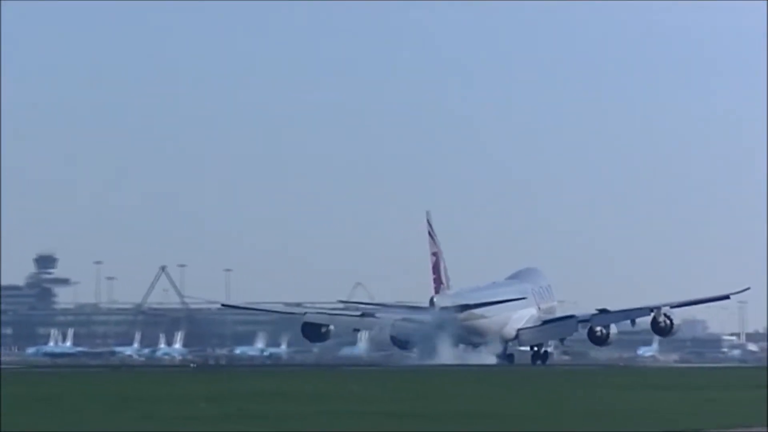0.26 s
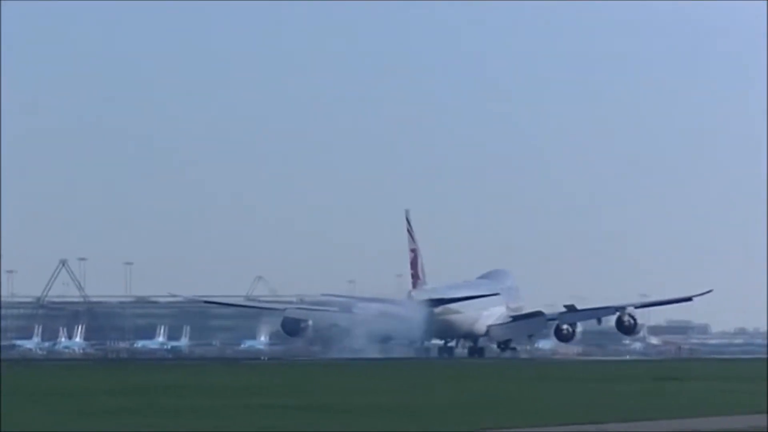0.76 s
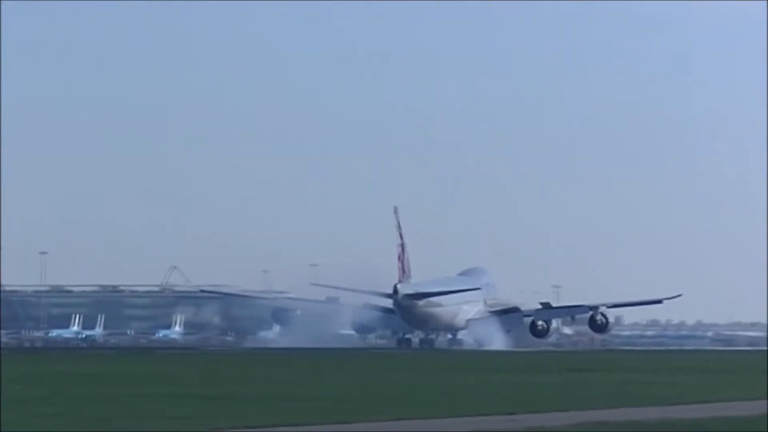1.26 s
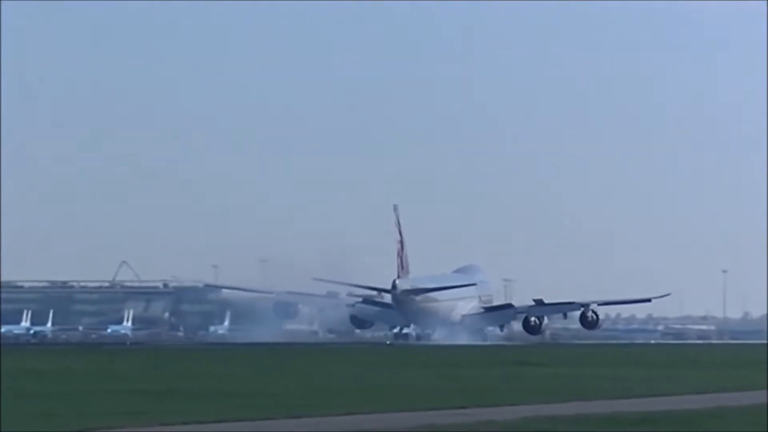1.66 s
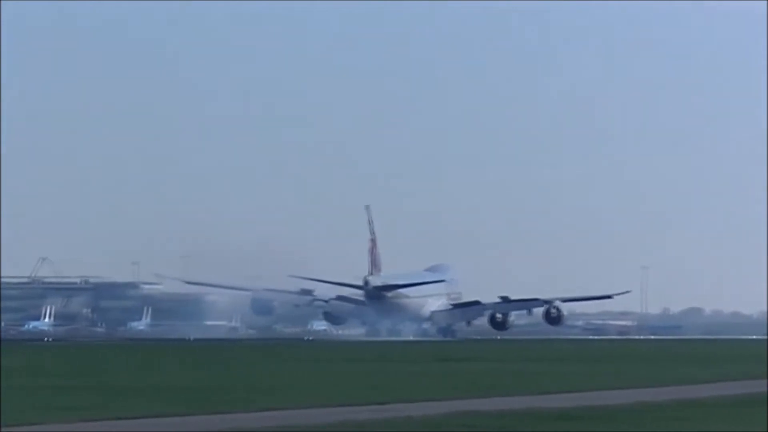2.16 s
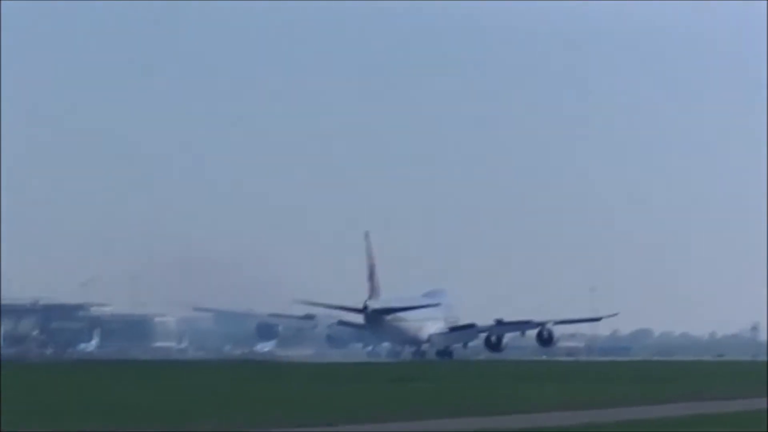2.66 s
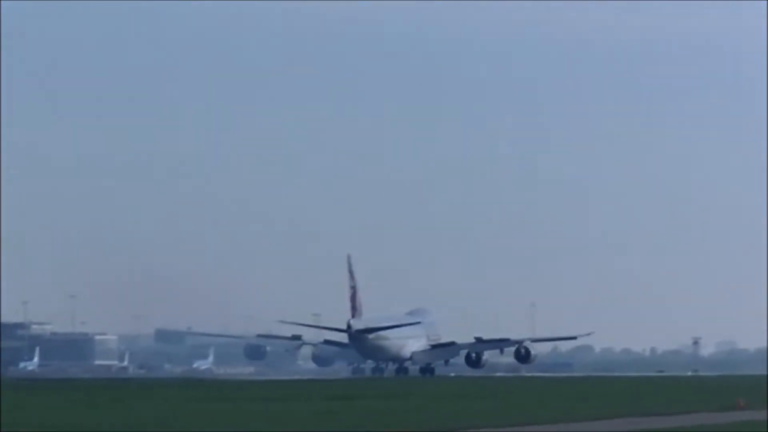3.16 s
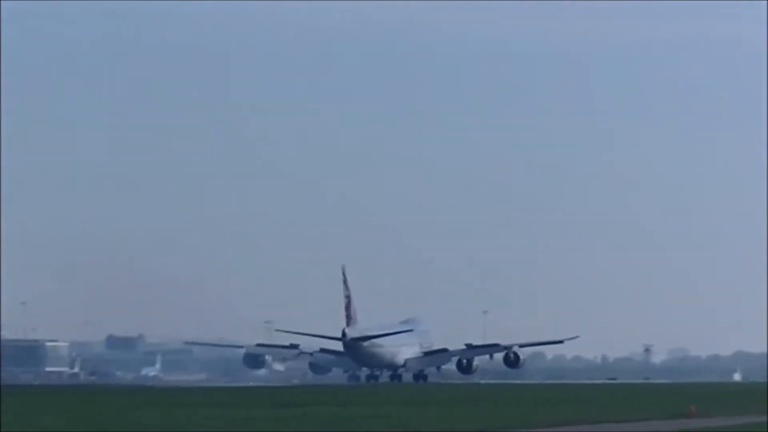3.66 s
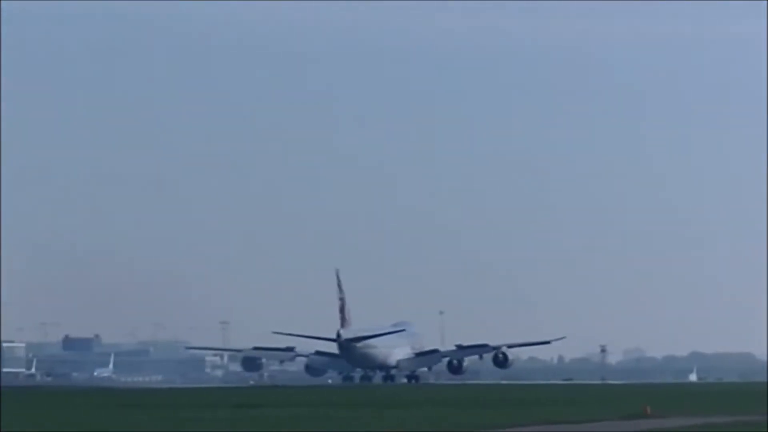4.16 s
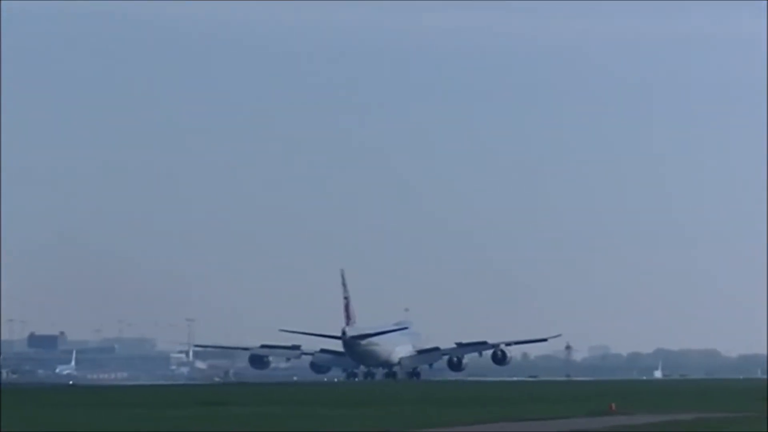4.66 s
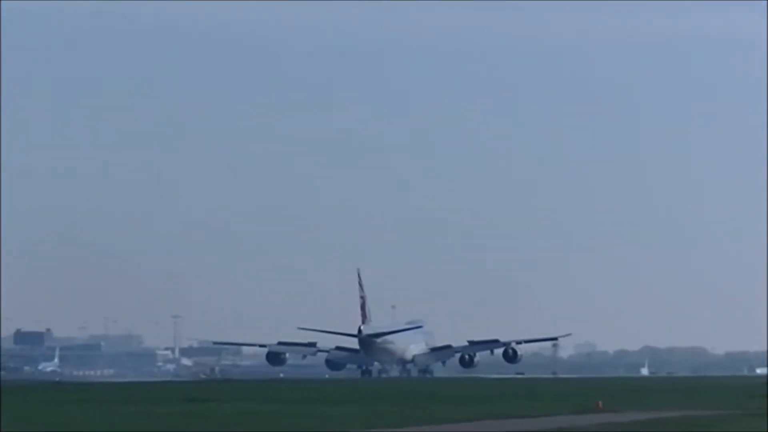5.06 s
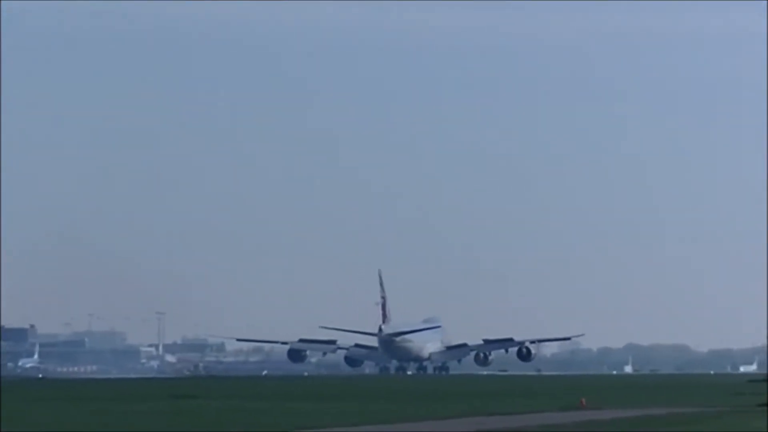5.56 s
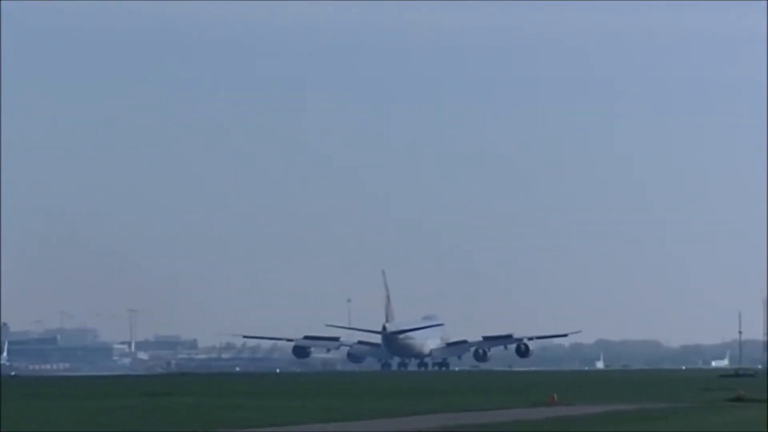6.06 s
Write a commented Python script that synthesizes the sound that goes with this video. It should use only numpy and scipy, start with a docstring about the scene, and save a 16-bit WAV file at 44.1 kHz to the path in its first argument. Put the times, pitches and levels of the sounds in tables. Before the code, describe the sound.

A distant four-engined jet rolls away after touchdown with a low billowing roar that swells midway, while small birds chirp and whistle in nearby grass.

```python
"""Airfield grass, far from the runway: a four-engined jet freighter rolls away just after touchdown.
Exhaust: patchy filtered noise that swells and billows in the wind as the tail turns this way, with swinging puffs.
Engine air: a finer noise rush, and a fan hiss that fades. Birds: gliding, swinging sines with scattered echoes.
The camera adds shaped noise hiss, a thin beating sine whine and noise ticks; light knocks ring in a few modes."""
import sys
import numpy as np
from scipy import signal
from scipy.fft import rfft, irfft
from scipy.io import wavfile
from scipy.ndimage import uniform_filter1d

SR = 44100
rng = np.random.default_rng(int(sys.argv[2]) if len(sys.argv) > 2 else 0)


def persist_wave(psi):
    """Save psi, clipped to +-1, as 16-bit WAV."""
    counts = np.round(np.clip(psi, -1, 1) * 32767).astype(np.int16)
    wavfile.write(sys.argv[1], SR, np.atleast_2d(counts).T)


N = 278712
TIME_S = np.arange(N) / SR
BINS_HZ = np.fft.rfftfreq(N, 1 / SR)
ALONG = np.linspace(0, 1, 64)  # progress through a note

# exhaust roar, swelling and surging: (time [s], level [dB])
ROAR_LEVEL = [(0.0, -37.5), (0.28, -34), (0.88, -38.5), (1.16, -29.5), (1.52, -35.5), (1.65, -29),
              (1.8, -35), (2.16, -29.5), (2.32, -34), (2.36, -30), (3.24, -26.5), (3.36, -28.5),
              (3.76, -25), (3.84, -28), (4.04, -24.5), (5.04, -32), (5.12, -27.5), (6.32, -30.5)]
# gain of the deep rumble within the roar: (time [s], gain [dB])
RUMBLE_GAIN = [(.75, -7), (1.1, -1.5), (3.7, -1.3), (4.3, 1), (5.1, 0.5)]
# brighter engine noise, before trims: (time [s], rush level [dB], fan hiss level [dB])
ENGINE_LEVELS = [(0, -41, -45.5), (0.8, -41, -48), (1.5, -44, -51), (2.4, -43.5, -53.5), (4.9, -44, -53.5),
                 (6.32, -40, -52)]
# relative spectra of roar, rush, fan hiss and camera hiss: (frequency [Hz], density [dB per Hz])
ROAR_SPECTRUM = [(20, -51), (48, -56), (80, -33), (140, -22), (280, -6.5), (335, -0.5), (385, -.5),
                 (440, -8.5), (560, -15.5), (750, -29), (1500, -40), (4000, -81.5)]
RUSH_SPECTRUM = [(200, -31), (480, 0), (800, 0), (900, -3.5), (1020, -4), (1300, -10.5), (1800, -13.5),
                 (3000, -34.5), (6000, -61)]
FAN_SPECTRUM = [(700, -27), (1400, -12), (1600, 2.5), (1750, 1), (1950, -4), (2600, -4.5), (2850, -12),
                (3500, -11), (4500, -11.5), (5100, -22), (6200, -34.5), (10000, -56)]
HISS_SPECTRUM = [(20, 9), (6000, 7), (7700, 3.5), (9000, 0.5), (12000, -2.5), (14200, -5), (15400, -12.5)]
# left-right likeness of engine noise: (frequency [Hz], coherence [0-1])
COHERENCE = [(40, .5), (65, 0.7), (110, 0.95), (330, 1), (700, 0.99), (1350, 0.85), (1700, 0.96),
             (4400, .94)]
# left microphone against right: (frequency [Hz], level lead [dB], phase lead [rad])
LEFT_LEAD = [(65, 5, -0.7), (200, -0.4, -0.44), (450, -1, 0.061), (620, -1.7, 0.32), (850, -4, 0.12),
             (1150, -1, 0.44), (1450, -1.3, 1.15), (1910, -1, 0.29), (2600, -3, 0.6), (3400, -5.5, 0.1),
             (4400, -0.5, 0.36)]
# exhaust puffs, before trim: (time [s], level [dB], half length [s])
PUFFS = [(0.269, -28, 0.013), (0.675, -26.5, 0.0079), (1.183, -23, 0.015), (2.798, -22.5, 0.0067),
         (3.211, -14.5, 0.0038), (3.473, -21.5, 0.01), (3.639, -18.5, 0.011), (4.78, -20, 0.0064),
         (5.151, -20.5, 0.016), (6.025, -22, 0.01)]
# camera body ticks, before trim: (time [s], level [dB], half length [s])
TICKS = [(1.524, -56, .003), (3.312, -56, .0022), (3.553, -55, 0.0028), (4.295, -58, .008),
         (4.87, -57, .002)]
# relative tick spectrum: (frequency [Hz], density [dB per Hz])
TICK_SPECTRUM = [(1000, -16), (4000, -8), (6000, 4), (8200, 0), (9500, -8), (15000, -21)]
# whine of the camera electronics: (mean frequency [Hz], level [dB])
WHINE = [(7800, -90), (7826, -87)]
# bouts of distant twitter: (time [s], length [s], level of the nearest chips [dB])
TWITTER = [(0.022, 0.87, -56), (1.301, .85, -61.5), (4.1, .85, -58), (5.05, 0.78, -59)]
# slurs of the nearest songbird, before trim: (time [s], length [s], opening [Hz], closing [Hz], level [dB])
SLURS = [(1.997, 0.057, 2480, 2800, -58), (2.11, 0.032, 3960, 4380, -61), (2.138, 0.046, 3660, 2640, -47),
         (2.19, 0.048, 2660, 3820, -45), (2.365, 0.053, 3230, 2710, -49.5),
         (2.512, 0.052, 4100, 4620, -53.5), (2.608, 0.054, 3930, 3510, -47.5),
         (2.826, .061, 3040, 3550, -50), (2.945, 0.035, 3900, 2950, -54.5), (3.272, 0.075, 2745, 3020, -52),
         (3.353, 0.04, 3120, 2910, -51), (3.452, 0.03, 3860, 2610, -49.5), (3.599, 0.09, 3456, 3196, -48.5),
         (3.675, 0.046, 3490, 2710, -50.5), (3.795, 0.042, 4020, 2900, -49),
         (3.834, 0.048, 2860, 2790, -49.5), (3.972, 0.033, 2810, 3230, -50),
         (3.992, 0.022, 3190, 2640, -45.5), (4.568, 0.022, 3330, 3150, -53.5),
         (4.803, 0.011, 3050, 3600, -51.5), (5.785, 0.048, 3770, 4100, -62)]
# quick downward chips, before trim: (time [s], middle pitch [Hz], level [dB])
CHIPS = [(.025, 4900, -64), (.097, 6500, -67), (1.636, 3660, -56), (2.315, 4280, -59), (4.929, 4460, -61),
         (5.037, 4870, -67), (5.294, 4470, -59), (6.238, 4100, -60)]
# falling trills, slow warble to burr: (time [s], length [s], middle pitch [Hz], nominal swing rate [Hz], level [dB])
TRILLS = [(0.584, 0.046, 3560, 75, -50), (0.748, .04, 3600, 70, -57), (1.149, 0.1, 5560, 50, -64),
          (1.426, 0.069, 4330, 140, -52.5), (1.843, 0.12, 3950, 60, -58), (2.642, 0.135, 3200, 39, -50),
          (4.257, .11, 3780, 90, -60), (4.375, .058, 4220, 120, -53), (4.617, 0.063, 3860, 60, -53),
          (4.78, .05, 4250, 100, -59), (4.823, .032, 3620, 32, -48.5), (5.187, 0.085, 3710, 63, -55.5),
          (5.576, 0.05, 3500, 85, -53.5), (5.734, 0.06, 3420, 75, -53)]
# three-note phrase stepping down: (delay [s], middle pitch [Hz], share of fall [1], level [dB])
PHRASE = [(0, 6060, 0.12, -68.5), (.016, 4150, 0.022, -56.5), (.034, 3680, .04, -61.5)]
# plaintive whistles: (time [s], length [s], pitch that the slide opens from [Hz], held pitch [Hz], level [dB])
WHISTLES = [(0.319, 0.12, 3260, 2970, -54.5), (0.468, .045, 5700, 5450, -64),
            (0.535, 0.16, 6550, 6570, -65.5), (0.819, 0.048, 4260, 4260, -55),
            (1.005, .051, 5700, 7200, -71), (1.08, 0.2, 5300, 5180, -60), (1.509, 0.11, 4010, 3420, -53),
            (1.52, 0.058, 4160, 4270, -52.5), (1.855, 0.063, 5450, 5480, -68),
            (1.957, 0.046, 5950, 5900, -64), (2.282, 0.046, 6800, 6600, -66),
            (2.817, 0.11, 5930, 5070, -69), (3.116, 0.06, 5200, 5240, -61),
            (3.159, .042, 4940, 3680, -56.5), (3.235, 0.16, 5250, 5000, -68.5),
            (5.318, 0.12, 3210, 2900, -56.5), (5.919, .165, 5060, 4270, -58),
            (5.99, 0.039, 5200, 6230, -71), (6.07, 0.13, 5870, 5140, -57), (6.15, 0.26, 5430, 5130, -59.5)]
# light, dull knocks: (time [s], gain on the summed modes [dB])
KNOCKS = [(0.406, -31.5), (6.107, -32)]
# knock modes: (frequency [Hz], relative level [dB], t60 [s])
KNOCK_MODES = [(1000, -5, .02), (1944, -2, 0.035), (2910, -10, .02), (3660, -10, .015), (4800, -9, 0.021)]

PUFF_HZ = 363.2  # mean swing rate of a puff
CHIP_S, CHIP_FALL = 0.031, 0.16  # length; share by which a chip opens high
TRILL_FALL = 0.051  # share by which a trill opens high
SWING_HZ_PER_RATE, SWING_LIMIT_HZ = 3.8, 300  # faster trills swing wider, up to a limit
SLOW_BEND, LINGER_HZ_PER_S = 0.8, 15000  # bend of a slow slur (1 is straight); faster slurs linger on top
RASP_HZ, RASP_LIMIT, HOARSE_RATE_HZ = 220, 0.67, 85  # flicker; largest share; swing rate of a fully hoarse trill
PHRASE_START_S, PHRASE_EVERY_S, PHRASE_NOTE_S = 5.396, 0.091, 0.022
SETTLE_PER_NOTE, WHISTLE_LIFT = 4.5, 0.018  # approach to the held pitch; share of lift at the end
# thin, evenly spaced calls that sag in pitch
THIN_START_S, THIN_EVERY_S, THIN_LENGTH_S = 3.675, 0.193, 0.075
THIN_HZ, THIN_SAG, THIN_DB = 6720, 0.025, -69.5
KNOCK_RISE_S = 0.0006  # soft contact
EDGE_HZ = 15250


def from_db(db):
    """Decibels to gain."""
    return 10 ** (np.asarray(db) / 20)


def unit(x):
    """Scales to an rms of one."""
    return x / np.sqrt(np.mean(x ** 2) + 1e-20)


def at_hz(points, hz):
    """Reads a table on a logarithmic frequency axis."""
    f_hz, value = np.transpose(points)
    return np.interp(np.log(hz + 1), np.log(f_hz + 1), value)


def tint(x, spectrum):
    """Filters a signal by a spectrum, to an rms of one."""
    return unit(irfft(rfft(x) * from_db(at_hz(spectrum, BINS_HZ)), N))


def drift(rate_hz):
    """Smooth random wander of rms one, rolled off steeply above the rate."""
    white = rfft(rng.standard_normal(N))
    return unit(irfft(white / (1 + (BINS_HZ / rate_hz) ** 4), N))


def add(track, s, sound):
    """Mixes a sound into a track at a time."""
    part = track[max(round(s * SR), 0):][:len(sound)]
    part += sound[:len(part)]


def at_microphones(pair):
    """Turns two unrelated noises into a far, wide source at two close microphones."""
    a, b = rfft(pair)
    angle = np.arccos(np.clip(at_hz(COHERENCE, BINS_HZ), -1, 1)) / 2
    shared, apart = a * np.cos(angle), b * np.sin(angle)
    ports = np.array(LEFT_LEAD)  # capsules differ in bass; the camera body shades them unequally
    level = from_db(at_hz(ports[:, [0, 1]], BINS_HZ) / 2)
    phase = np.exp(0.5j * at_hz(ports[:, [0, 2]], BINS_HZ))
    lead = level * phase
    return irfft(np.array([(shared + apart) * lead, (shared - apart) / lead]), N)


def turbulence(spectrum, patchy_db, flutter_db, flutter_hz):
    """Flow noise after a long way through moving air: bands fade in patches, the whole flutters."""
    z = signal.stft(rng.standard_normal((2, N)), nperseg=1024, noverlap=768)[2]
    patches = uniform_filter1d(rng.standard_normal(z.shape[1:]), size=7, axis=0)  # across frequency
    patches = unit(uniform_filter1d(patches, size=16, axis=1))  # across time
    patchy = z * from_db(patchy_db * patches)
    pair = signal.istft(patchy, nperseg=1024, noverlap=768)[1][:, :N]
    flow = tint(at_microphones(pair), spectrum)
    return unit(flow * from_db(flutter_db * drift(flutter_hz)))


def with_puffs(roar, puff_trim_db=-1, wander=0.0696, takeover=0.31):
    """Now and then one large eddy takes over part of the roar for a few swings."""
    hz = PUFF_HZ * (1 + wander * drift(80))
    swing = unit(np.sin(2 * np.pi * np.cumsum(hz) / SR))
    for s, level_db, half_s in PUFFS:
        bump = np.exp(-((TIME_S - s) / half_s) ** 2)
        roar = roar * (1 - takeover * bump) + from_db(level_db + puff_trim_db) * bump * swing
    return roar


def exhaust(bass_hz=175):
    """Jets mixing with the air: a deep billowing roar; its rumble has its own gain curve, fullest past 4 s."""
    roar = turbulence(ROAR_SPECTRUM, patchy_db=0.98, flutter_db=0.5, flutter_hz=30)
    roar /= np.sqrt(uniform_filter1d((roar ** 2).mean(0), size=6000))  # quick billows, even mean
    # the largest eddies beam straight behind the tail
    bass = irfft(rfft(roar) / (1 + (BINS_HZ / bass_hz) ** 4), N)
    rumble_gain = from_db(np.interp(TIME_S, *np.transpose(RUMBLE_GAIN)))
    roar = roar + bass * (rumble_gain - 1)
    level_db = np.interp(TIME_S, *np.transpose(ROAR_LEVEL))
    return with_puffs(roar * from_db(level_db))


def engine_air(rush_trim_db=1.5, fan_trim_db=1):
    """Finer eddies rush above the roar; fans hiss above that, their top lost in the air."""
    s, rush_db, fan_db = np.transpose(ENGINE_LEVELS)
    rush = turbulence(RUSH_SPECTRUM, patchy_db=1.0, flutter_db=0.4, flutter_hz=12)
    fans = turbulence(FAN_SPECTRUM, patchy_db=1.4, flutter_db=0.0, flutter_hz=10)
    rush_gain = from_db(np.interp(TIME_S, s, rush_db) + rush_trim_db)
    fan_gain = from_db(np.interp(TIME_S, s, fan_db) + fan_trim_db)
    return rush * rush_gain + fans * fan_gain


def camera(hiss_db=-64.5, tick_trim_db=-1, whine_wander_hz=3):
    """Steady microphone hiss, a thin beating whine and small soft handling ticks."""
    hiss = from_db(hiss_db) * tint(rng.standard_normal((2, N)), HISS_SPECTRUM)
    whine = np.zeros(N)
    for mean_hz, level_db in WHINE:
        hz = mean_hz + whine_wander_hz * drift(2)
        whine += from_db(level_db) * unit(np.sin(2 * np.pi * np.cumsum(hz) / SR))
    taps = np.zeros(N)
    for s, level_db, half_s in TICKS:
        taps += from_db(level_db + tick_trim_db) * np.exp(-((TIME_S - s) / half_s) ** 2)
    return hiss + whine + taps * tint(rng.standard_normal((2, N)), TICK_SPECTRUM)


def falling(hz, share):
    """Pitch sliding down through hz, opening higher by a share; a negative share rises."""
    return hz * (1 + share) ** (1 - 2 * ALONG)


def note(length_s, pitches_hz, swing_hz=0, swing_rate_hz=0, slowing=0.4, peaked=0.37, uneven_db=2.5, count=6):
    """One bird note: a near sine on a glide; a trill swings it unevenly, slowing and narrowing."""
    t = np.arange(int(length_s * SR)) / SR
    along = t / t[-1]
    vigour = 1 + slowing * (1 - 2 * along)
    stumble_db = uneven_db * np.interp(along, np.linspace(0, 1, count), rng.standard_normal(count))
    rate_hz = swing_rate_hz * np.sqrt(vigour) * from_db(stumble_db)
    trill_hz = vigour * swing_hz * np.sin(2 * np.pi * np.cumsum(rate_hz) / SR)
    hz = np.interp(along, ALONG, pitches_hz) + trill_hz
    swell = np.sin(np.pi * along).clip(0) ** peaked * signal.windows.tukey(len(t), 0.2)
    return unit(np.sin(2 * np.pi * np.cumsum(hz) / SR) * swell)


def rasped(sound, rasp):
    """Makes a bird note hoarse: a share of it breaks into quick, uneven flickers."""
    share = np.clip(rasp, 0, 1)
    smoothing = signal.windows.hann(int(SR / RASP_HZ))
    flicker = signal.fftconvolve(rng.standard_normal((2, SR // 4)), smoothing[None], "same", axes=1)
    a, b = unit(flicker)[:, :len(sound)] * np.sqrt(share / 2)
    return unit((signal.hilbert(sound) * (np.sqrt(1 - share) + a + 1j * b)).real)


def off_axis(x, lean_db=-1.5, lead_s=2.4e-5):
    """A small source in the grass reaches two microphones a little apart in level and time."""
    lead = from_db(lean_db / 2) * np.exp(1j * np.pi * BINS_HZ * lead_s)
    return irfft(rfft(x) * np.array([lead, 1 / lead]), N)


def open_field(x, wet_db, t60_s):
    """Thin scattered echoes from the ground and far hedges, different on each side."""
    t = np.arange(SR // 2) / SR
    sparse = rng.random((2, len(t))) < 1500 / SR  # about 1500 echoes per second
    taps = rng.standard_normal((2, len(t))) * sparse * from_db(-60 * t / t60_s)
    taps /= np.linalg.norm(taps, axis=1, keepdims=True)
    return off_axis(x) + from_db(wet_db) * signal.fftconvolve(x[None], taps, axes=1)[:, :N]


def hedge_echo(song, delay_s=0.056, echo_db=-14):
    """One distinct echo from a hedge."""
    return song + from_db(echo_db) * np.pad(song, (round(delay_s * SR), 0))[:N]


def far_birds(low_hz=3200, high_hz=4600, fall=0.13, rising_share=0.32, spread_db=6,
              swing_hz=300, swing_rate_hz=90, rasp=0.35, count=40):
    """Distant birds twitter in dense runs of short burry chips, most of them falling."""
    chatter = np.zeros(N)
    for start_s, length_s, level_db in TWITTER:
        for k, (when, height, size, steep, distance, burr) in enumerate(rng.random((count, 6))):
            glide_hz = falling(low_hz + height * (high_hz - low_hz), fall * (steep - rising_share))
            chip = rasped(note(0.011 + 0.022 * size, glide_hz, burr * swing_hz, swing_rate_hz), rasp)
            s = start_s + length_s * (k + when) / count
            add(chatter, s, from_db(level_db - spread_db * distance) * chip)
    return open_field(chatter, wet_db=-8.5, t60_s=0.22)


def slur(length_s, opening_hz, closing_hz):
    """Slide between two pitches; fast ones hang on top and flick through the low end."""
    span_hz = abs(closing_hz - opening_hz)
    from_top = ALONG if opening_hz > closing_hz else 1 - ALONG
    bend = SLOW_BEND + (span_hz / length_s / LINGER_HZ_PER_S) ** 2
    return max(opening_hz, closing_hz) - span_hz * from_top ** bend


def near_birds(slur_trim_db=1, chip_trim_db=1, phrase_rasp=0.3, waver_db=1.5, waver_hz=60,
               quiver_rad=0.7, quiver_hz=45, count=4):
    """Songbirds in the grass: glides and trills wavering a little in strength and pitch."""
    song = np.zeros(N)
    for s, length_s, opening_hz, closing_hz, level_db in SLURS:
        slurred = note(length_s, slur(length_s, opening_hz, closing_hz))
        add(song, s, from_db(level_db + slur_trim_db) * slurred)
    for s, hz, level_db in CHIPS:
        add(song, s, from_db(level_db + chip_trim_db) * note(CHIP_S, falling(hz, CHIP_FALL)))
    for s in PHRASE_START_S + PHRASE_EVERY_S * np.arange(count):
        for delay_s, hz, fall, level_db in PHRASE:
            step = rasped(note(PHRASE_NOTE_S, falling(hz, fall)), phrase_rasp)
            add(song, s + delay_s, from_db(level_db) * step)
    for s, length_s, hz, rate_hz, level_db in TRILLS:
        swing_hz = min(SWING_HZ_PER_RATE * rate_hz, SWING_LIMIT_HZ)
        trill = note(length_s, falling(hz, TRILL_FALL), swing_hz, rate_hz)
        rasp = RASP_LIMIT * min(rate_hz / HOARSE_RATE_HZ, 1) ** 2
        add(song, s, from_db(level_db) * rasped(trill, rasp))
    song = (signal.hilbert(song) * np.exp(1j * quiver_rad * drift(quiver_hz))).real
    wavering = song * from_db(waver_db * drift(waver_hz))
    return open_field(hedge_echo(wavering), wet_db=-11.0, t60_s=0.24)


def settling(opening_hz, held_hz):
    """Pitch that slides quickly at first, holds, and lifts a little at the end."""
    lifted_hz = held_hz * (1 + WHISTLE_LIFT * ALONG ** 3)
    return lifted_hz + (opening_hz - held_hz) * np.exp(-SETTLE_PER_NOTE * ALONG)


def whistling_birds(waver_db=1.8, waver_hz=40, count=4):
    """Pure whistles and thin calls: smooth in pitch, wavering in strength on their way through the air."""
    song = np.zeros(N)
    for s, length_s, opening_hz, held_hz, level_db in WHISTLES:
        add(song, s, from_db(level_db) * note(length_s, settling(opening_hz, held_hz)))
    for s in THIN_START_S + THIN_EVERY_S * np.arange(count):
        add(song, s, from_db(THIN_DB) * note(THIN_LENGTH_S, falling(THIN_HZ, THIN_SAG)))
    wavering = song * from_db(waver_db * drift(waver_hz))
    return open_field(hedge_echo(wavering), wet_db=-9, t60_s=0.46)


def knocks():
    """Light knocks: decaying modes with a softened onset."""
    t = np.arange(SR // 10) / SR
    ring = np.zeros(len(t))
    for hz, level_db, t60_s in KNOCK_MODES:
        ring += from_db(level_db - 60 * t / t60_s) * np.sin(2 * np.pi * hz * t)
    ring *= 1 - np.exp(-t / KNOCK_RISE_S)
    track = np.zeros(N)
    for s, gain_db in KNOCKS:
        add(track, s, from_db(gain_db) * ring)
    return track


def scene():
    """Aircraft, camera, birds and knocks together."""
    aircraft = exhaust() + engine_air()
    birds = far_birds() + near_birds() + whistling_birds()
    return aircraft + camera() + birds + knocks()


def record(dry):
    """The recorder's band limit: a steep linear-phase low-pass."""
    low_pass = signal.firwin(401, EDGE_HZ, window=("kaiser", 9), fs=SR)
    return signal.oaconvolve(dry, low_pass[None], "same")


dry = scene()
out = record(dry)
persist_wave(out)
```